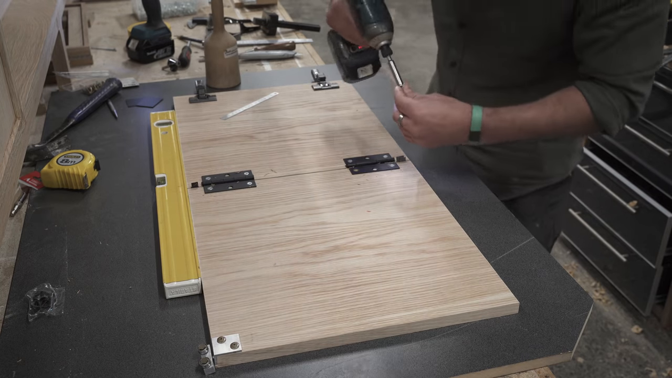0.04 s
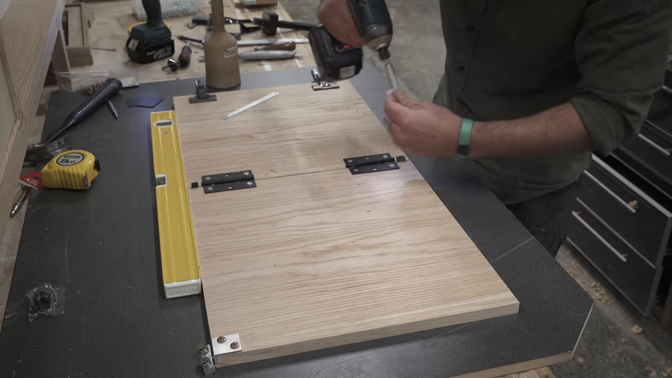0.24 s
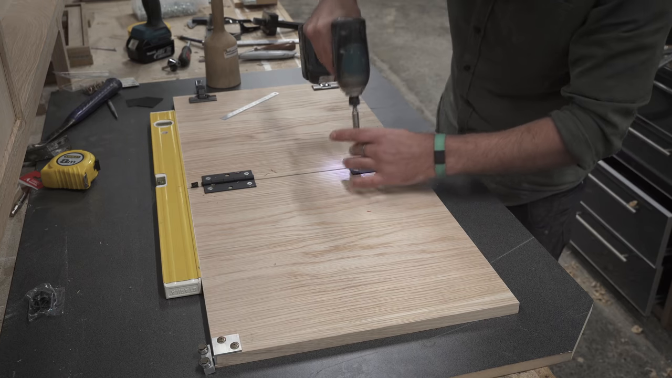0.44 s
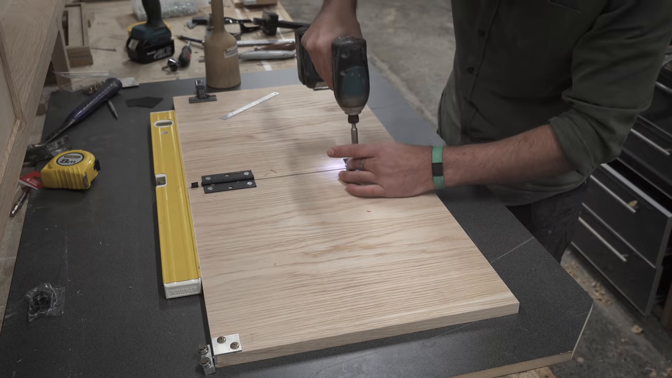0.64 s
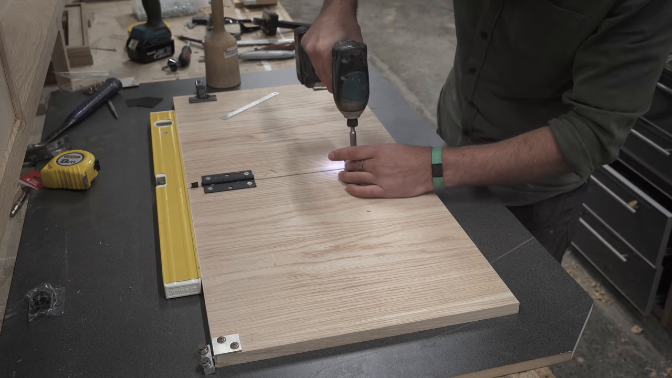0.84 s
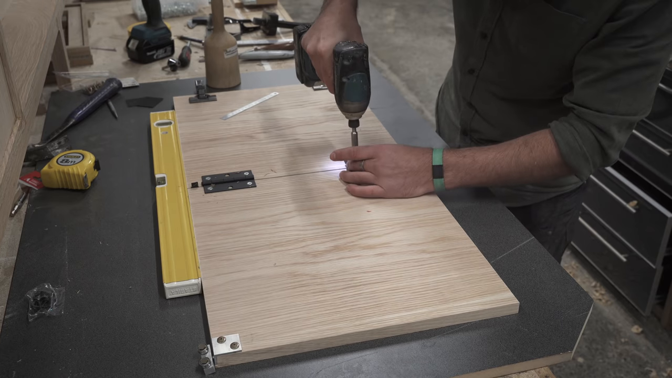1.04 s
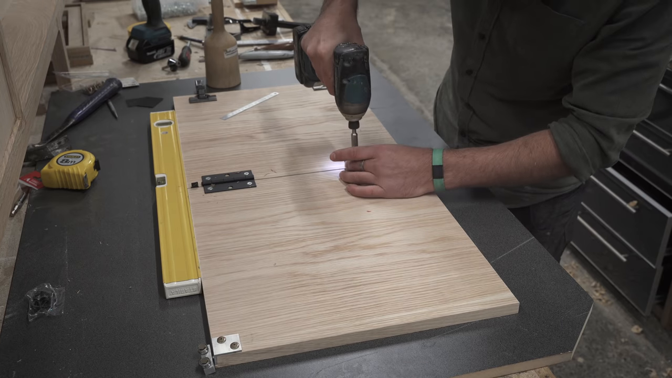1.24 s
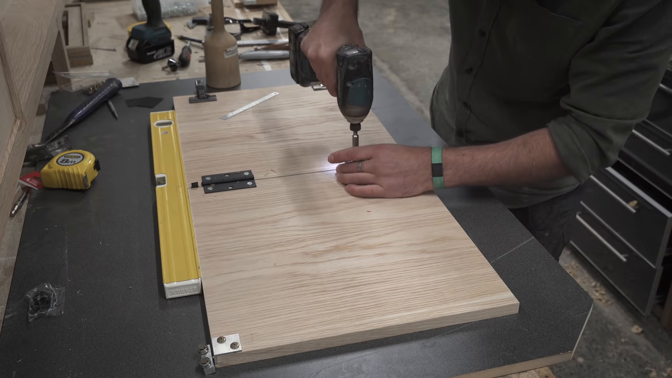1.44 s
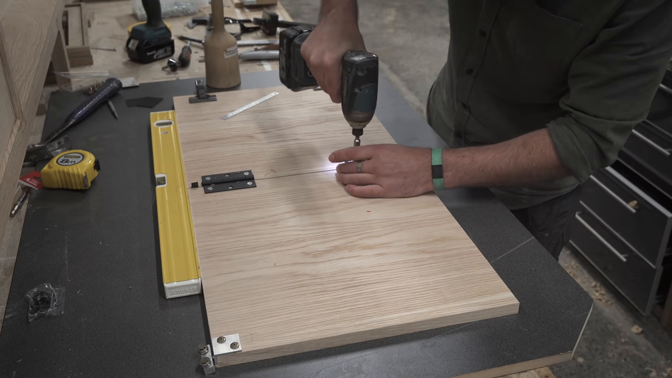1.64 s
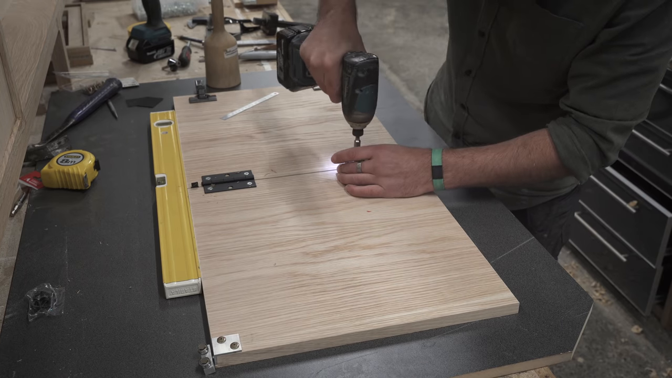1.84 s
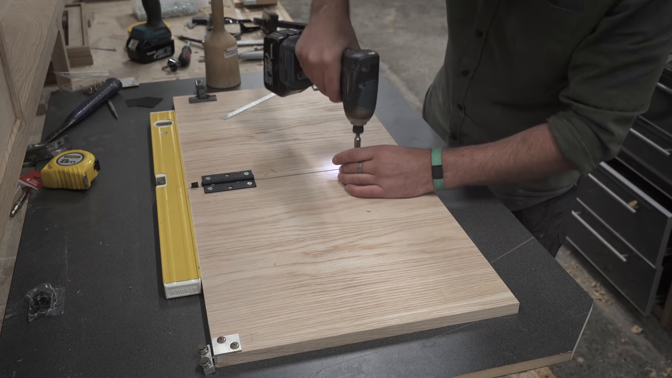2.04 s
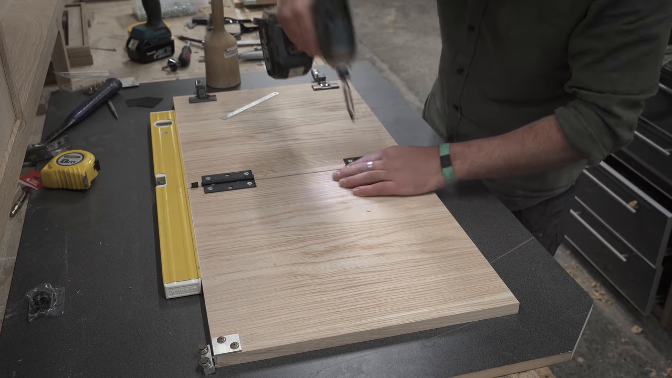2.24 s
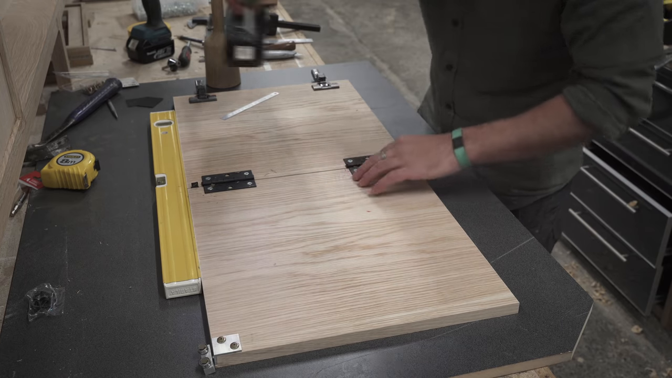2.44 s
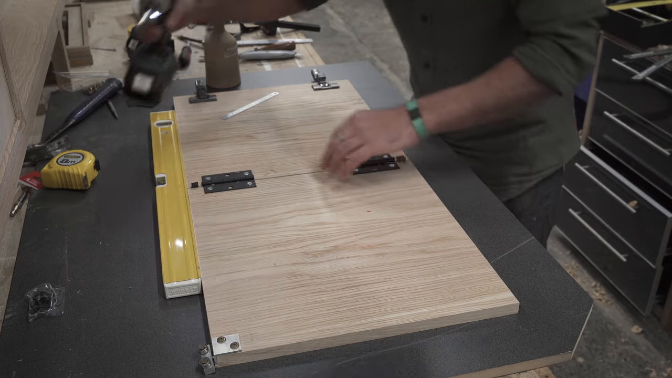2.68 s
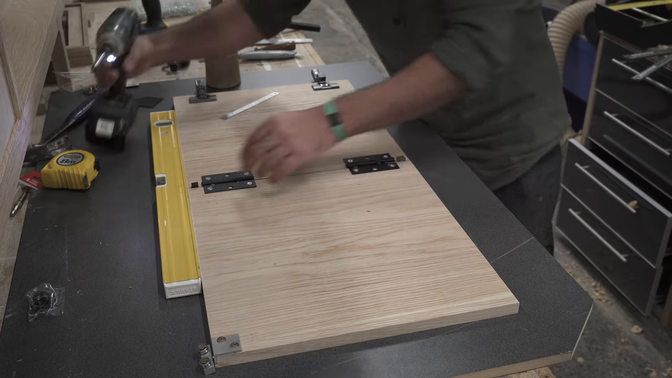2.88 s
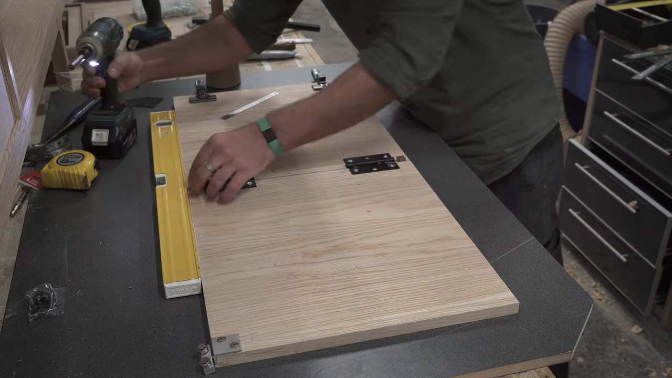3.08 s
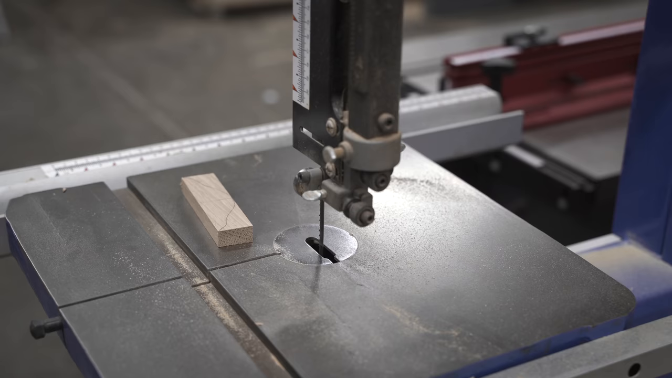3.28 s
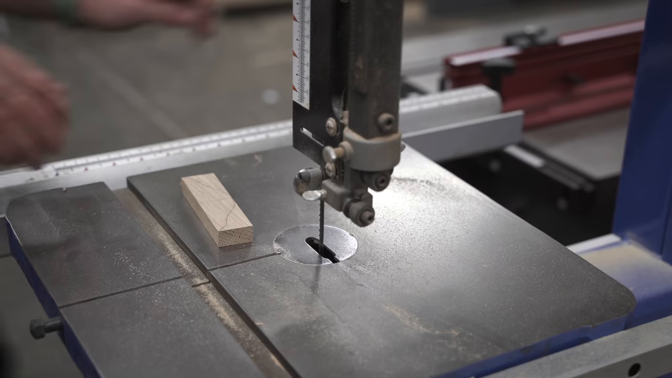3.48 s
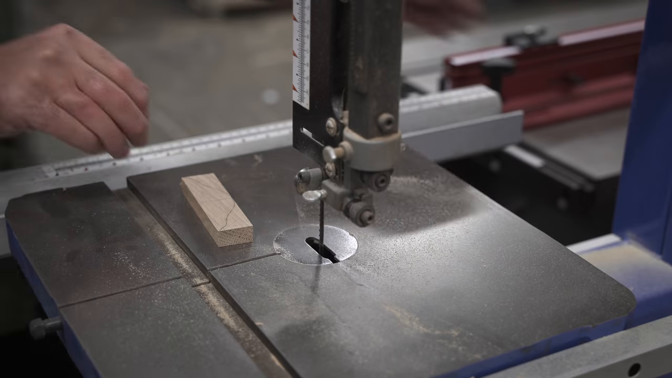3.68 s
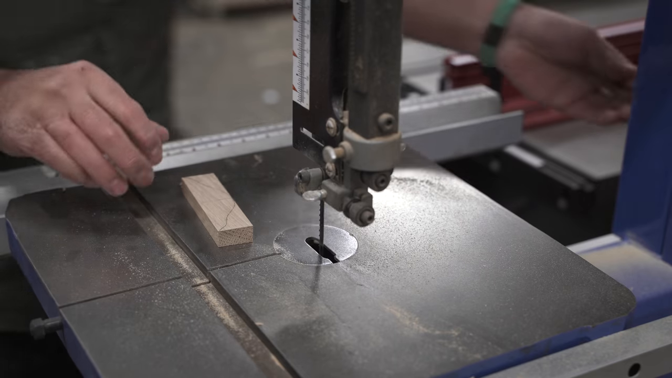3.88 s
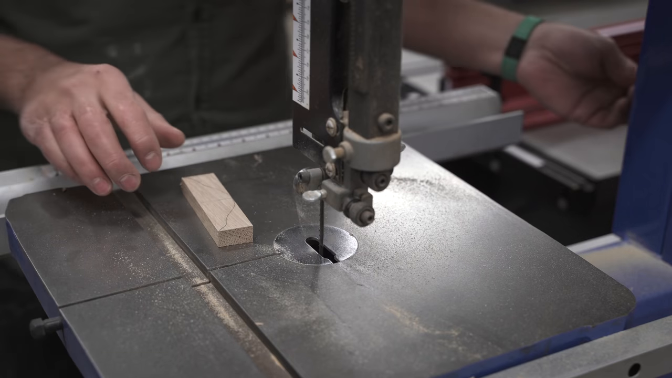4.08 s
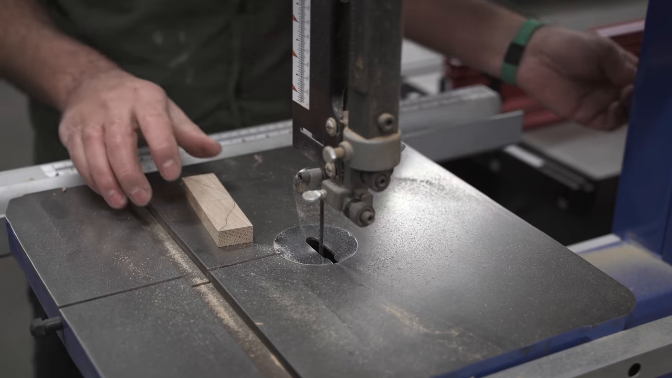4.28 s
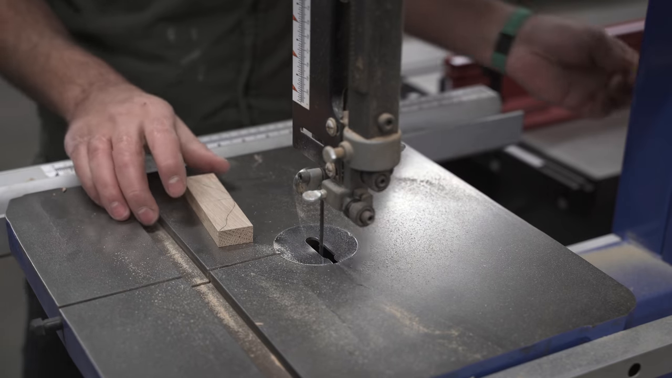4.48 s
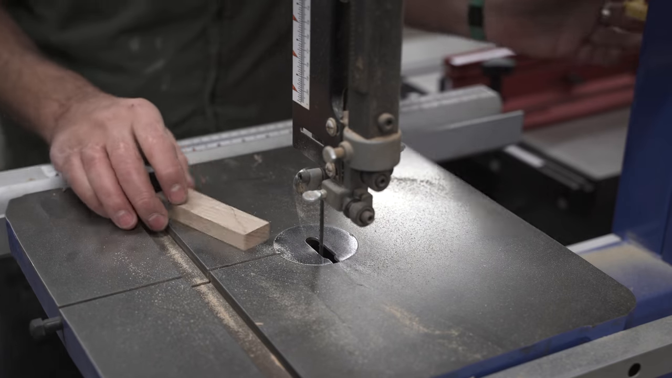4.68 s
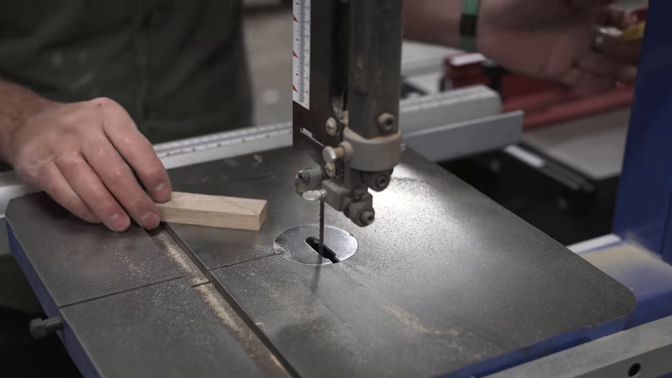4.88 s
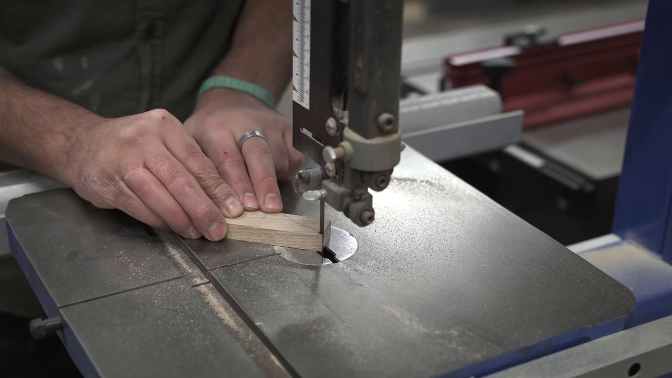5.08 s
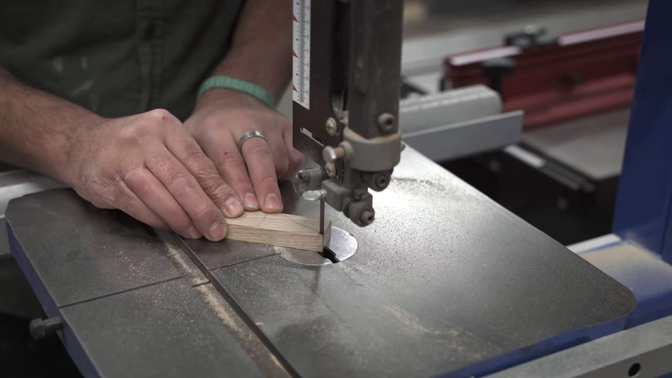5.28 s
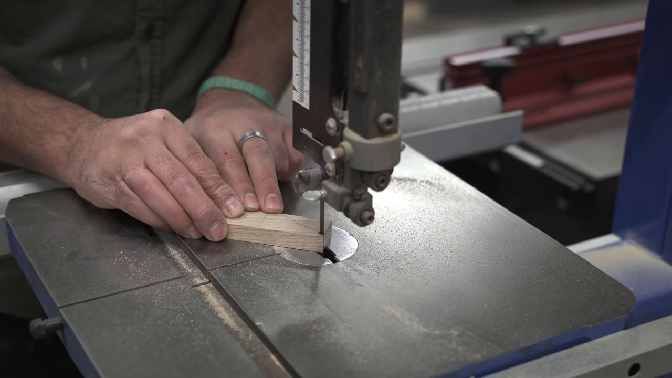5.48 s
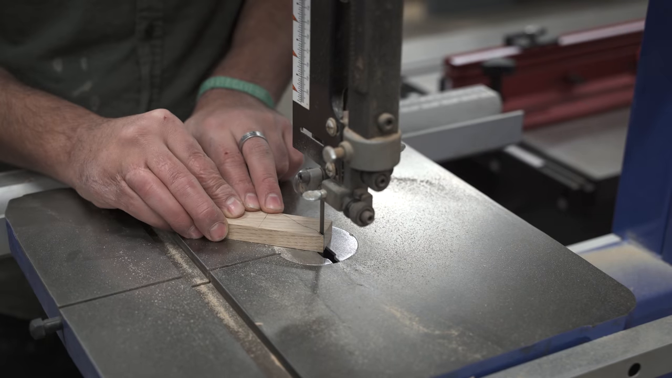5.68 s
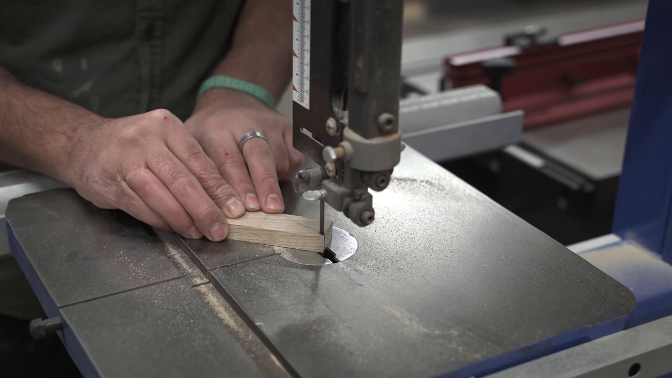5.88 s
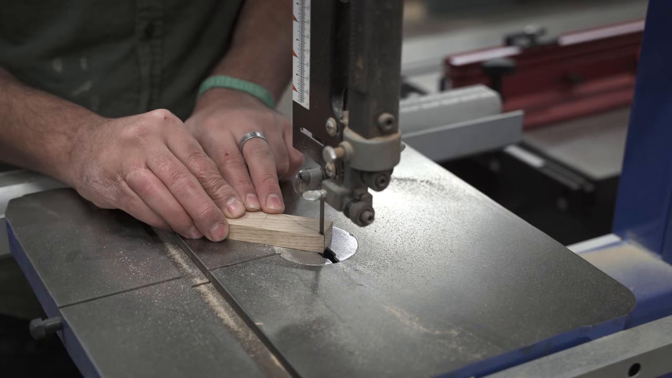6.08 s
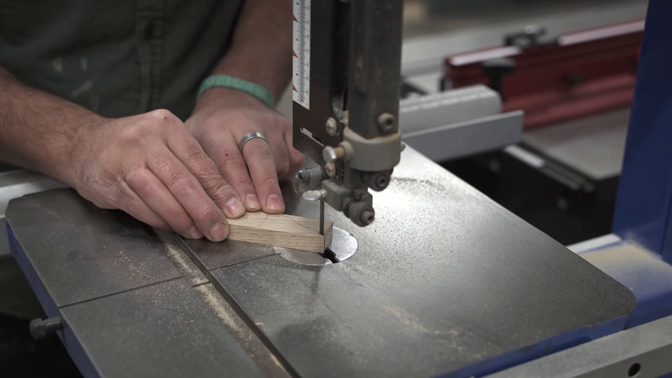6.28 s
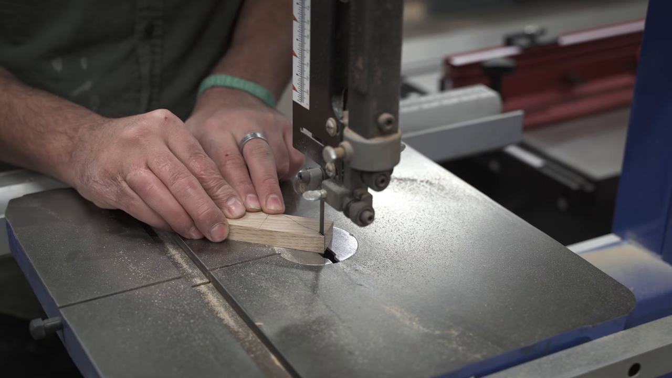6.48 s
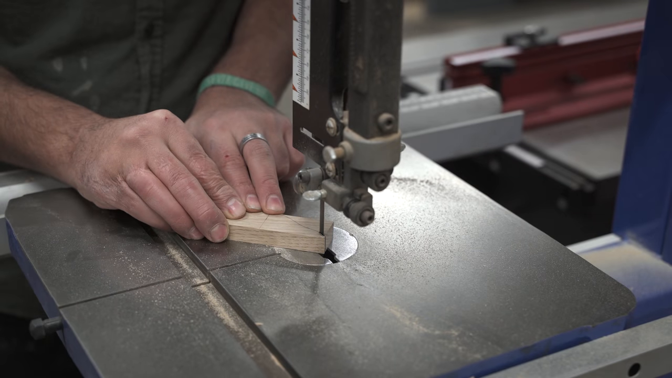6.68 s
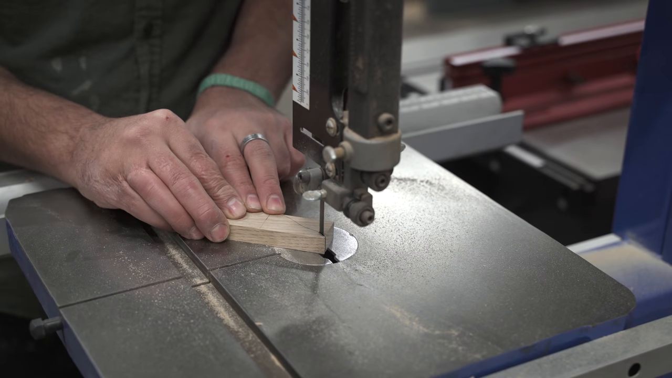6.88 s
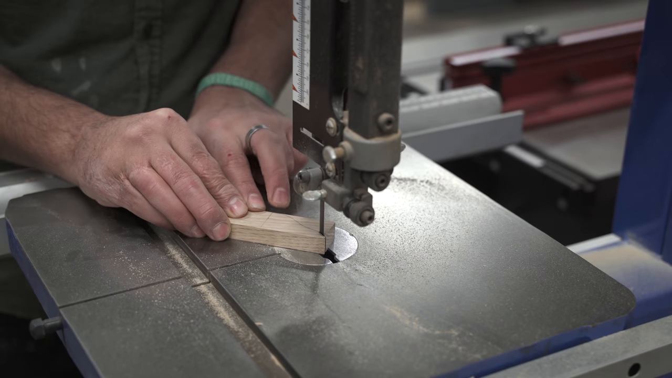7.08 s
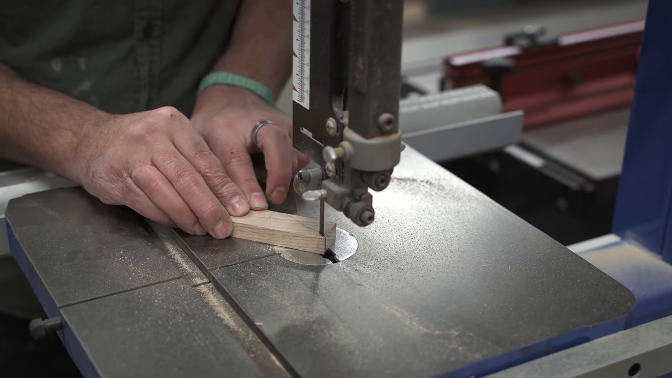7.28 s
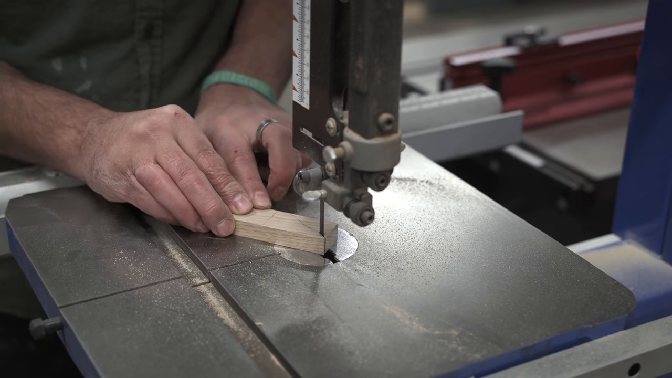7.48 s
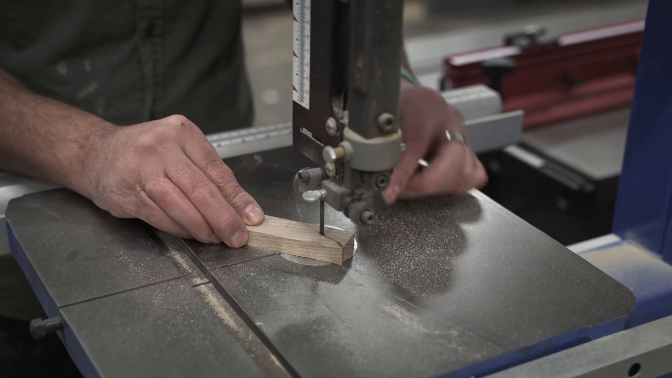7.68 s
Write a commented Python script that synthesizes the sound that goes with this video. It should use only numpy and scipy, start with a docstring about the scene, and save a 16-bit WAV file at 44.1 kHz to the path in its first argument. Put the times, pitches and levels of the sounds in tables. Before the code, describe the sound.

In a mildly reverberant workshop with low hum, faint clicks lead to a short impact driver burst, whining and hammering a pine panel so hard it slightly overloads the close microphone. Two shorter bursts follow, then knocks on the bench. A hard cut brings quiet rubs and a switch clack; another brings a band saw cutting wood with a bright, ringing whine and rapid ticking.

```python
"""Three shots in a woodworking shop, joined by hard cuts; pitched sources are sines, rough ones are shaped noise.
First an impact driver sets a screw into a hinge on a pine panel: gears whine and rasp, blows ring the panel and
overload the input stage. It spins free and is put down with knocks on the bench. Next, hands handle hardware
near a band saw, with clicks and grainy rubs, and a switch clacks. Last the band saw cuts a small block:
its teeth sing near 1 kHz in sines, noise makes the cut, and the blade weld ticks past once a lap."""
import sys
import numpy as np
from scipy import signal
from scipy.fft import rfft, irfft, next_fast_len
from scipy.io import wavfile

SR = 44100
rng = np.random.default_rng(int(sys.argv[2]) if len(sys.argv) > 2 else 0)


def transcribe(u):
    """Save the signal u as a 16-bit wav file named by the first command-line argument.

    u: samples, shape (n,) or (channels, n), limited to [-1, 1]; the rate is SR.
    q: integer samples, one column per channel.
    """
    v = np.clip(np.atleast_2d(u).T, -1, 1)
    q = np.round(v * 32767).astype(np.int16)
    wavfile.write(sys.argv[1], SR, q)


N = 341334
T = np.arange(N) / SR
SECOND_SHOT_S, THIRD_SHOT_S = 3.16, 5.039


def amp(db):
    """Turn decibels into a gain."""
    return 10 ** (np.asarray(db) / 20)


def rms_one(x):
    """Scale a sound to an average strength (rms) of 1."""
    return x / np.sqrt(np.mean(x ** 2) + 1e-20)


def in_time(rows):
    """Draw straight lines between the rows, giving each column a value at every sample."""
    seconds, *columns = np.transpose(rows)
    return [np.interp(T, seconds, column) for column in columns]


def during(rows):
    """True from the first row's time to the last row's."""
    return (T >= rows[0][0]) & (T < rows[-1][0])


def at_hz(points, hz):
    """Read a curve of levels or times between its frequencies, on a log axis."""
    table = np.array(points)
    return np.interp(np.log(hz + 1), np.log(table[:, 0]), table[:, 1])


def hiss(spectrum):
    """Noise coloured by a spectrum, silent outside its ends, at rms 1."""
    size = next_fast_len(N)
    hz = np.arange(size // 2 + 1) * SR / size
    inside = (hz > spectrum[0][0]) & (hz < spectrum[-1][0])
    white = rfft(rng.standard_normal(size))
    return rms_one(irfft(white * amp(at_hz(spectrum, hz)) * inside, size)[:N])


def drift(rate_hz):
    """A random wander with spread 1: smoothed noise, computed at every 40th sample."""
    r = np.exp(-80 * np.pi * rate_hz / SR)
    white = rng.standard_normal(N // 40 + 2002)
    slow = signal.lfilter([1], [1, -2 * r, r * r], white)[2000:]     # drop the filter's start
    return np.interp(np.arange(N) / 40, np.arange(len(slow)), rms_one(slow))


def ring(pulses, hz, t60):
    """A resonance: each unit pulse starts a sine that falls by 60 dB in t60 seconds."""
    r = amp(-60 / (t60 * SR))
    w = 2 * np.pi * hz / SR
    # the tiny offset keeps the filter clear of very small, slow numbers
    return signal.lfilter([0, np.sin(w)], [1, -2 * r * np.cos(w), r * r], pulses + 1e-18)


def swell(start, end, db, rise_db_per_s, fall_db_per_s):
    """Gain that climbs to db at start, holds until end, then falls."""
    climb = rise_db_per_s * np.clip(start - T, 0, .2)
    fall = fall_db_per_s * np.clip(T - end, 0, .5)
    return amp(db - climb - fall)


def strike(times, peak_db, crack_db, tilt_db, modes, crack_t60, crack_hz, thud_db, thud_t60, thud_hz, crack_order=1):
    """Blows ring every mode of a body, with a short noisy crack and a dense dull thud."""
    whole_body_hz = 300     # below this every blow pushes the body the same way
    at = (np.array(times) * SR).astype(int)
    out, pulses = np.zeros(N), np.zeros(N)
    spread_db = rng.normal(0, 2.2, (len(at), len(modes)))
    sign = rng.choice([-1, 1], (len(at), len(modes)))
    for k, (hz, level_db, t60) in enumerate(modes):
        blow_db = np.array(peak_db) + level_db + tilt_db * np.log2(hz / 700) + spread_db[:, k]
        pulses[at] = amp(blow_db) * (sign[:, k] if hz > whole_body_hz else 1)
        out += ring(pulses, hz, t60)
    crack = (crack_db, crack_t60, [300, crack_hz], crack_order)
    thud = (np.array(peak_db) + thud_db, thud_t60, [200, thud_hz], 2)
    for db, t60, band, order in (crack, thud):
        pulses[at] = amp(db)
        fading = signal.lfilter([1], [1, -amp(-60 / (t60 * SR))], pulses + 1e-18)
        noise = signal.lfilter(*signal.butter(order, band, "band", fs=SR), rng.standard_normal(N))
        out += fading * rms_one(noise)
    return out


def gear_rasp(blow_times, blow_db):
    """Lumpy noise and loose gear contacts ringing in the housing, while the motor runs or a blow shakes it."""
    # trigger pulls: start/s, end/s, relative rasp level/dB
    pulls = [(1.442, 1.744, -24.5), (1.917, 2.033, -34), (2.503, 2.691, -31.5)]
    # colour of the rasp: f/Hz, level/dB per Hz
    rasp_colour = [(290, -51), (500, -16), (586, -32), (639, -12), (707, -12), (1320, -4), (2280, -2.5),
                   (3420, 0.5), (9260, -12), (14300, -18.5), (15800, -20)]
    # driver housing resonances: f/Hz, level/dB, t60/s
    housing = [(1270, -11, 0.0074), (2070, -21, 0.0061), (2870, -4, 0.0086), (3470, -17, 0.013),
               (4590, 9.5, 0.0081), (5220, 7, 0.0075), (6200, -5, 0.0034)]
    spin_up_db_per_s, brake_db_per_s = 700, 1500
    blow_rasp_db, blow_fade_s = -1, 0.014     # rasp over the blow's level; time to fall to 37 %
    contacts = rng.standard_normal(N) * (rng.random(N) < 900 / SR)     # about 900 a second
    rattle = rms_one(sum(amp(db) * ring(contacts, hz, t60) for hz, db, t60 in housing))
    rasp = (hiss(rasp_colour) + amp(-6.5) * rattle) * amp(2 * drift(86))
    running, pulled, shaken = 0, 0, 0
    for start, end, db in pulls:
        # the rasp reaches its level 22 ms into the pull
        running = running + swell(start + 0.022, end, db, spin_up_db_per_s, brake_db_per_s)
        pulled = pulled + swell(start, end, 0, spin_up_db_per_s, brake_db_per_s)
    for s, db in zip(blow_times, blow_db):
        fade = np.exp(-np.clip(T - s, 0, 1) / blow_fade_s)
        shaken = shaken + (T > s) * fade * amp(db + blow_rasp_db)
    return (running + shaken * pulled) * rasp


def gear_whine():
    """Meshing gear teeth give a wobbling tone and two overtones, each passed by the housing in its own way."""
    # one table a pull: t/s, mesh f/Hz, level before the housing/dB
    whine = [
        [(1.44, 1420, -33), (1.46, 1469, -27), (1.49, 1455, -20), (1.505, 1425, -33), (1.525, 1880, -23),
         (1.545, 1900, -20), (1.58, 1844, -20), (1.605, 1680, -20), (1.635, 1520, -13), (1.655, 1355, -12),
         (1.685, 1343, -12), (1.71, 1403, -27), (1.755, 1370, -28)],
        [(1.94, 1426, -31), (1.96, 1440, -26), (2.045, 1386, -38)],
        [(2.505, 1299, -48), (2.545, 1430, -30), (2.575, 1526, -41), (2.6, 1704, -34), (2.63, 1526, -43),
         (2.66, 1310, -39), (2.685, 1203, -36), (2.695, 912, -38), (2.73, 896, -67)],
    ]
    # how the housing passes each partial: f/Hz, gain/dB
    radiate = [(900, 5), (1350, -15), (1520, -9), (1880, -7), (2400, -9), (2900, -2), (3300, -5),
               (3750, -13), (4100, -14), (4550, -6), (5000, -11), (5600, -13)]
    out, wobble = 0, 1 + .025 * drift(160)
    lumps = [amp(4 * drift(45) + 4 * drift(250)) for k in range(3)]
    for pull in whine:
        hz, db = in_time(pull)
        phase = 2 * np.pi * np.cumsum(hz * wobble) / SR
        for k in (1, 2, 3):
            level = lumps[k - 1] * amp(db + at_hz(radiate, k * hz))
            out = out + during(pull) * level * np.sin(k * phase)
    return out


def hammer_blows():
    """Times and levels of the driver's blows on its anvil, each late by a small random time."""
    # runs of blows: start/s, end/s, blow rate/Hz, strength/dB
    runs = [(1.509, 1.52, 45, -19), (1.648, 1.749, 46, -11), (1.955, 2.036, 46, -12)]
    blows = np.array([(s, db) for start, end, rate, db in runs for s in np.arange(start, end, 1 / rate)])
    return blows[:, 0] + rng.uniform(0, 0.00491, len(blows)), blows[:, 1]


def hammer(times, peak_db):
    """The blows go down the screw and ring the panel."""
    # pine panel resonances: f/Hz, level/dB, t60/s
    panel = [(122.3, -5.5, 0.19), (179, -8.5, 0.086), (266.6, -7, 0.09), (345, -14, 0.065),
             (420.4, -10.5, 0.1), (550, -4.5, 0.04), (682, -6.5, 0.031), (911, -10, 0.086),
             (1152, -1.5, 0.031), (1480, -19, 0.049), (1966, -6, 0.049), (2650, -20, 0.021)]
    return strike(times, peak_db, peak_db - 3.5, 0, panel, crack_t60=0.052, crack_hz=4000,
                  thud_db=-2.0, thud_t60=0.084, thud_hz=980)


def clunks():
    """The gears take up their slack: soft blows ring one housing tone."""
    # clunks: t/s, strength/dB
    slack = [(1.495, -24), (2.528, -29), (2.55, -18.5), (2.678, -25)]
    hz, t60_s, soft_s = 1350, 0.035, 0.0015     # soft_s rounds the start
    seconds, db = np.transpose(slack)
    blows = np.zeros(N)
    blows[(seconds * SR).astype(int)] = amp(db)
    fade, soft = amp(-60 / (t60_s * SR)), np.exp(-1 / (soft_s * SR))
    envelope = signal.lfilter([1 - soft], np.convolve([1, -fade], [1, -soft]), blows + 1e-18)
    return envelope * np.cos(2 * np.pi * hz * T)


def chirp():
    """The motor chirps as it spins up: a thin, flickering sine that rises in pitch."""
    # chirps: t/s, hold/s, level before flicker/dB
    spin_ups = [(1.418, .025, -52), (1.925, .025, -41), (2.515, .045, -47)]
    start_hz, hz_per_s, rise_db_per_s, fall_db_per_s = 8160, 15000, 700, 200
    out, flicker, wobble = 0, amp(5 * drift(60)), 1 + .009 * drift(100)
    for s, hold, db in spin_ups:
        hz = start_hz + hz_per_s * np.clip(T - s, -.1, .3)
        tone = np.sin(2 * np.pi * np.cumsum(hz * wobble) / SR)
        out = out + swell(s, s + hold, db, rise_db_per_s, fall_db_per_s) * tone
    return out * flicker


def put_down():
    """The driver is put down: its knocks ring the bench top."""
    # knocks: t/s, strength/dB, crack level/dB, brightness/dB per octave
    knocks = [(2.969, -19.5, -20, 2), (2.9734, -25.5, -27, 1), (2.982, -27, -40, -2),
              (2.99, -28, -28, -0.5), (3.004, -39, -30, 1), (3.0554, -17.5, -12.5, 2.5),
              (3.067, -26, -35, 0.5), (3.08, -32, -34, -1)]
    # bench top resonances: f/Hz, level/dB, t60/s
    bench_top = [(105, -6, .1), (160, -6, .08), (248, 0, .08), (330, -5, .05), (450, -7, .05),
                 (600, -4, .05), (760, -3, .05), (1150, -7, .03), (1520, -9, .02), (1960, 0, .022),
                 (2650, -13, .012), (3300, -9, .01), (4000, -10, .012), (5250, -8, .008)]
    return strike(*np.transpose(knocks), bench_top, crack_order=2, crack_t60=0.019, crack_hz=5400,
                  thud_db=-7.0, thud_t60=0.096, thud_hz=1770)


def band_saw():
    """Teeth strike at a nearly steady rate; the wheel turn flutters them and the weld ticks each lap."""
    # the cut: t/s, bright noise/dB, top hiss/dB, first tooth tone/dB, second tooth tone/dB
    cut = [(5.04, -31.5, -39, -39, -47), (5.33, -31, -38, -36, -30), (5.43, -32, -38, -42, -34),
           (5.52, -32, -39, -34, -38), (5.64, -35.5, -44, -47, -37), (6.0, -35.5, -46, -44, -32.5),
           (6.35, -36.5, -45, -50, -30), (6.68, -34.5, -45, -58, -30), (6.8, -34, -39, -43, -29.5),
           (7.04, -38, -44, -44, -35), (7.11, -36.5, -44, -40, -40), (7.3, -36, -39, -53, -38.5),
           (7.44, -31.5, -36, -30.5, -30), (7.62, -33, -41, -48, -41), (7.645, -30.5, -39, -37, -27.5),
           (7.74, -32, -39, -37, -32)]
    # tooth overtones: multiple of the tooth rate, level over the singing/dB, change deep in the block/dB
    overtones = [(3, -11.5, 7), (5, -6, -4), (6, -12, 7), (7, -23, -5), (8, -17, 9), (9, -7, 6),
                 (12, -9, -7), (14, -20, 0), (15, -16, 3)]
    # colours of the low, bright and top cutting noise: f/Hz, level/dB per Hz
    low_colour = [(24, -48), (40, -1.5), (103, -24), (126, -61), (166, -2.5), (267, -15.5), (745, -8.5),
                  (908, -9.5), (983, -6), (1270, -13), (1710, -12), (2000, -8.5), (2440, -11.5),
                  (2970, -10), (4500, -13), (5850, -11.5), (9900, -120)]
    bright_colour = [(2060, -30), (3500, -10), (3890, -1.5), (4330, -6), (5070, 4.5), (5640, -5.5),
                     (5940, -2), (6330, -3.5), (6680, 6), (7420, 2), (8610, 4), (10600, -5.5), (12400, -7),
                     (16100, -33), (22000, -120)]
    top_colour = [(12000, -8), (12400, -10), (12900, -2), (13500, -4), (13900, -3), (14400, -1), (14800, 0),
                  (15300, -7), (15900, -11)]
    # hum of motor and wheels: f/Hz, relative level/dB
    hum_lines = [(102, -51.5), (167, -48.5)]
    tooth_hz, wheel_hz, wheel_swing_rad = 987, 83.5, .18
    weld_s, lap_s = 5.064, .2035     # first weld tick, time of one lap
    weld_mean_db, weld_spread_db, weld_fade_s, weld_rise_s = -34, 3, 0.013, 0.00089
    throb_db, throb_late_s = 3, 0.067

    bright_db, top_db, first_db, second_db = in_time(cut)
    brighter_db = bright_db + 34     # over the mean brightness of -34 dB
    low_db = -30 + 0.21 * brighter_db
    sing_db = -43 + 3 * brighter_db
    deep = np.interp(T, [6.5, 7.4], [0, 1])     # the blade goes deep into the block
    phase = 2 * np.pi * np.cumsum(tooth_hz * (1 + 0.00286 * drift(25.9))) / SR
    wheel = np.cos(2 * np.pi * wheel_hz * T + 0.71 * drift(6.5))
    tone = 0
    for k, db in [(1, first_db), (2, second_db)]:
        tone = tone + amp(db + 3.0 * drift(24.0)) * np.sin(k * phase + wheel_swing_rad * wheel)
    for k, db, deep_db in overtones:
        tone = tone + amp(db + deep_db * deep + sing_db + 4.6 * drift(50)) * np.sin(k * phase)

    lap, since_weld = np.divmod(T - weld_s, lap_s)
    tick_db = (weld_mean_db + weld_spread_db * rng.standard_normal(64))[lap.astype(int) % 64]
    tick_shape = np.exp(-since_weld / weld_fade_s) * np.clip(since_weld / weld_rise_s, 0, 1)
    # dividing by the bright level keeps the tick's size however loud the cut
    weld = 1 + amp(tick_db - bright_db) * tick_shape
    bite = amp(1.47 * drift(53)) * (1 + 0.11 * wheel)     # uneven teeth bite unevenly
    low = amp(low_db - 3 + 1.25 * drift(16)) * hiss(low_colour) * np.sqrt(weld)
    bright = amp(bright_db) * hiss(bright_colour) * weld
    top = amp(top_db) * hiss(top_colour) * weld ** 0.84
    hum = 0
    for hz, db in hum_lines:
        hum = hum + amp(db + 2.5 + 1.4 * drift(20)) * np.sin(2 * np.pi * hz * T + 0.63 * drift(5.4))
    # the hum swells once a lap, a little after the weld
    throb = amp(throb_db * np.cos(2 * np.pi * (since_weld - throb_late_s) / lap_s))
    return tone + low + (bright + top) * bite + hum * throb + blade_rings(low_db, sing_db, deep)


def blade_rings(low_db, sing_db, deep):
    """Noise rings blade and guides; low resonances follow the low cutting noise, high ones the singing."""
    # resonances: f/Hz, width/Hz, level over the sound they follow/dB, change deep in the block/dB
    peaks = [(1129, 190, -10.5, -3), (1548, 110, -14.5, -4.5), (2059, 77, -9, 2), (2197, 91, -13, 1.5),
             (2795, 40, -14.5, -0.5), (2998, 114, -14, 5), (7870, 69, -20, 5), (8530, 300, -11, 10),
             (9040, 130, -9, -4), (11500, 70, -14, -8)]
    noise = rng.standard_normal(N)
    out = 0
    for hz, width, db, deep_db in peaks:
        follow_db = low_db if hz < 5000 else sing_db
        level = amp(db + deep_db * deep + follow_db + 1.56 * drift(6.4))
        out = out + level * rms_one(ring(noise, hz, 3.23 / width))
    return out


def switch():
    """A switch clacks: a few close blows ring the saw cabinet."""
    # clacks: t/s, strength/dB, crack level/dB, brightness/dB per octave
    clacks = [(4.3593, -29, -23, 4), (4.3612, -20, -15, 0), (4.3635, -32, -24, 4), (4.368, -31, -37, 2)]
    # saw cabinet resonances: f/Hz, level/dB, t60/s
    cabinet = [(175, -16, .08), (226, 2, .3), (234, 0, .3), (270, -8, .12), (540, -15, .05), (730, -4, .09),
               (930, -6, .05), (1150, -9, .04), (1300, -2, .04), (1530, -10, .03), (2020, -13, .02),
               (3260, -7, .012), (4650, -2, .008), (6620, -12, .006)]
    return strike(*np.transpose(clacks), cabinet, crack_t60=0.01, crack_hz=9050,
                  thud_db=-13.5, thud_t60=0.26, thud_hz=1230)


def clicks():
    """Clicks and bright housing rings: each a fading tick of noise in a wide band round its ring."""
    # clicks of trigger, chuck and hardware, and bright housing rings under two hammer blows (1.953, 2.02 s):
    # t/s, strength/dB, ring f/Hz
    ticks = [(0.0243, -37, 7000), (.164, -45, 9000), (1.41, -26, 2500), (1.428, -18.5, 2480),
             (1.9, -32, 9000), (1.953, -15, 4400), (2.02, -19, 5000), (2.066, -25, 6000),
             (2.4856, -23, 5500), (2.4924, -29, 9600), (2.5066, -39, 5960), (2.5454, -11.5, 3030),
             (2.677, -29, 3500), (2.7115, -23, 3360), (3.99, -43, 4500), (4.2053, -35.5, 5000),
             (4.5994, -47, 4800), (4.67, -44, 4800)]
    out, length = np.zeros(N), 1500
    fade = amp(-60 * np.arange(length) / SR / 0.022)
    for s, db, hz in ticks:
        tick = rng.standard_normal(length) * fade
        band = signal.butter(1, [hz / 2.7, hz * 1.52], "band", fs=SR, output="sos")
        start = int(s * SR)
        out[start:start + length] += amp(db) * signal.sosfilt(band, tick)
    return out


def rubs():
    """Fingers slide over metal and wood: grainy friction noise, with its own treble for each rub."""
    # rubs: t/s, rise/s, hold/s, level/dB, treble gain/dB
    slides = [(3.727, .005, .06, -62, 8.5), (3.983, 0.029, 0.022, -46, -2), (4.03, .03, 0.13, -58, -3),
              (4.205, 0.0022, 0.015, -49.5, -2), (4.665, 0.036, 0.065, -56.5, 6.5)]
    # friction colour: f/Hz, level/dB per Hz
    friction = [(880, 1), (1500, -1), (2790, -7), (2990, -4.5), (4890, -4), (7110, -15.5), (10000, -13.5),
                (11000, -29), (15800, -21)]
    rise_db, fall_db_per_s, treble_hz = 13, 398, 3500     # climbs rise_db in the rise time
    noise = hiss(friction) * amp(2.0 * drift(50) + 2.7 * drift(300))
    treble = signal.sosfilt(signal.butter(2, treble_hz, "high", fs=SR, output="sos"), noise)
    out = 0
    for s, rise, hold, db, treble_db in slides:
        gain = swell(s, s + hold, db, rise_db / rise, fall_db_per_s)
        out = out + gain * (noise + (amp(treble_db) - 1) * treble)
    return out


def shop(x, wet_db):
    """Reverberation: half-octave bands of noise, each with its own level and decay."""
    # echo of the shop: f/Hz, t60/s, level/dB
    echo = np.array([(100, 0.74, 1), (403, 1, -2), (1450, 1, -3.5), (4100, 0.86, -7), (8000, 0.64, -10),
                     (14000, .3, -12)])
    t, tail = np.arange(SR) / SR, 0
    for low in 45 * 2. ** np.arange(0, 8.5, .5):
        sos = signal.butter(2, [low, low * np.sqrt(2)], "band", fs=SR, output="sos")
        band = signal.sosfilt(sos, rng.standard_normal(SR))
        tail = tail + band * amp(at_hz(echo[:, [0, 2]], low) - 60 * t / at_hz(echo, low))
    tail = tail * np.clip((t - .004) / 0.006, 0, 1)     # the first walls answer after a few ms
    return x + amp(wet_db) * signal.fftconvolve(x, tail)[:N]


def fan():
    """A fan hums near the bench: steady sines that waver a little."""
    # hum lines: f/Hz, relative level/dB
    lines = [(48.4, -41.5), (96.9, -51.5), (193.8, -58), (296.1, -60.5)]
    return sum(amp(db + 3 + drift(6)) * np.sin(2 * np.pi * hz * T + .3 * drift(2)) for hz, db in lines)


def bench_air():
    """Shop air and hum at the bench, as coloured noise."""
    # colour: f/Hz, level/dB per Hz
    air = [(15, -42.5), (25, -10), (55, -2.5), (76, -16), (200, -15), (269, -20.5), (415, -17.5),
           (574, -24.5), (622, -23.5), (860, -23), (1100, -29), (1220, -30), (15900, -62.5)]
    return amp(-42) * hiss(air)


def saw_air():
    """Shop air and hum near the saw, as coloured noise."""
    # colour: f/Hz, level/dB per Hz
    air = [(15, -34), (25, -24), (55, 1.5), (82, -19.5), (113, -13.5), (277, -20), (308, -17.5), (475, -26),
           (515, -22), (639, -25.5), (908, -26), (1830, -39), (15900, -68)]
    return amp(-44) * hiss(air)


def faint_whine():
    """A thin high whine hangs in the shop: noise in one narrow resonance, coming and going."""
    hz, width_hz, db = 3650, 45, -77
    tone = rms_one(ring(rng.standard_normal(N), hz, 2.9 / width_hz))
    return amp(db + 4.3 * drift(4.8)) * tone


def scene():
    """Mix the three shots, cut hard from one to the next, the same sound left and right."""
    first, third = T < SECOND_SHOT_S, T >= THIRD_SHOT_S
    second = ~first & ~third
    ticks_and_rubs = clicks() + rubs()
    blows = hammer_blows()
    driver = gear_rasp(*blows) + gear_whine() + clunks() + chirp() + hammer(*blows)
    bench = shop(driver + put_down() + ticks_and_rubs * first, -38) + bench_air() + fan()
    hands = shop(switch() + ticks_and_rubs * second, -39) + saw_air()
    mid = bench * first + hands * second + band_saw() * third + faint_whine() * ~third
    return np.array([mid, mid])


def record(dry):
    """The input stage flattens loud peaks, its coupling makes flat tops droop, noise joins and the top is cut."""
    # rumble and hiss that differ between the two capsules: f/Hz, level/dB per Hz
    capsule = [(18, 0), (50, 1.5), (80, -8), (240, -11), (500, -17.5), (900, -22), (2000, -30),
               (5000, -45.5), (15900, -51)]
    overload, droop_hz, self_noise_db = .125, 45, -62.5
    headroom, sag_s, sag_level = .8, .012, .05
    first = T < SECOND_SHOT_S
    keep = np.exp(-1 / (sag_s * SR))
    load = signal.lfilter([1 - keep], [1, -keep], np.abs(dry[0]))
    # a sudden peak passes higher by the headroom share, until the stage sags under lasting load
    bench_limit = overload * (1 + headroom * np.exp(-(load / sag_level) ** 2))
    limit = np.where(first, bench_limit, .3)
    x = dry / (1 + np.abs(dry / limit) ** 6) ** (1 / 6)
    x = signal.sosfilt(signal.butter(1, droop_hz, "high", fs=SR, output="sos"), x)
    capsule_noise = amp(-55 + 3 * first) * hiss(capsule)     # 3 dB more at the bench
    # capsule noise has opposite signs left and right
    x = x + amp(self_noise_db) * rng.standard_normal(N) + capsule_noise * [[1], [-1]]
    x = signal.sosfilt(signal.ellip(10, .3, 40, 15730, fs=SR, output="sos"), x)
    return signal.sosfilt(signal.ellip(10, .2, 70, 16457, fs=SR, output="sos"), x)


dry = scene()
out = record(dry)
transcribe(out)
```